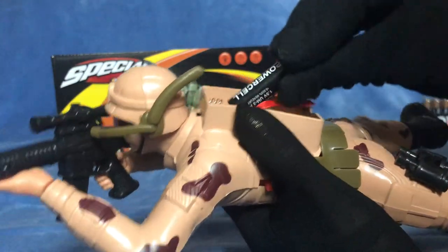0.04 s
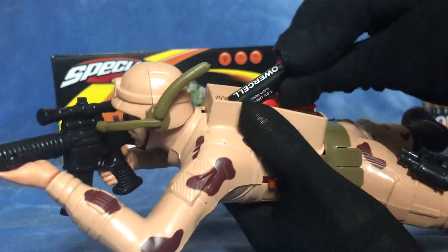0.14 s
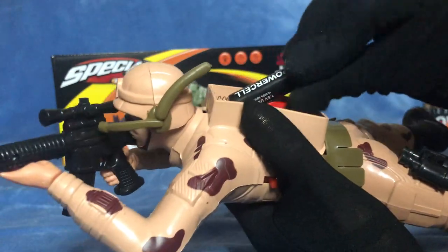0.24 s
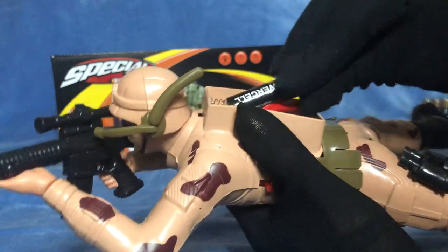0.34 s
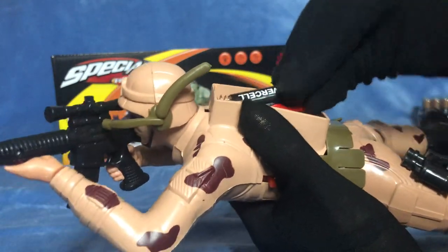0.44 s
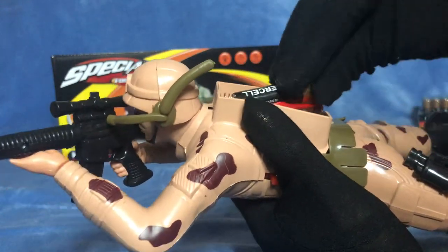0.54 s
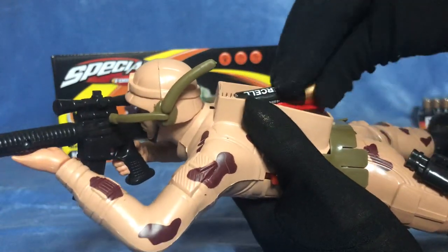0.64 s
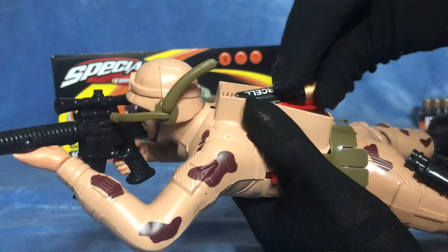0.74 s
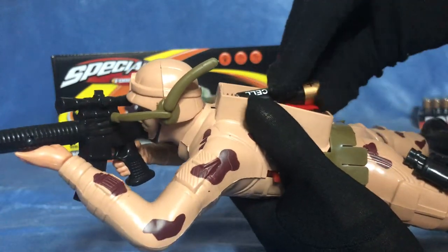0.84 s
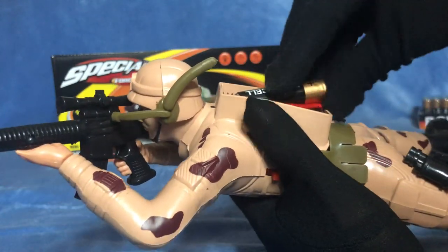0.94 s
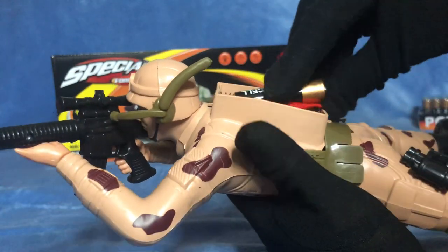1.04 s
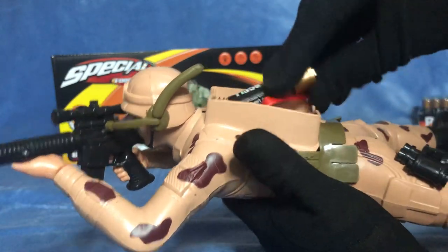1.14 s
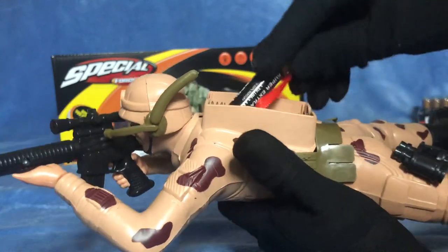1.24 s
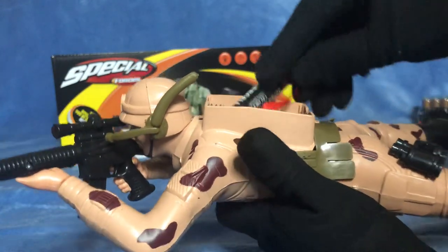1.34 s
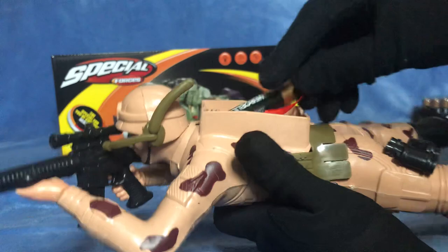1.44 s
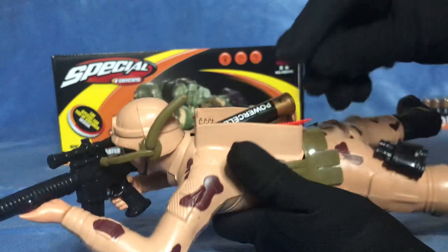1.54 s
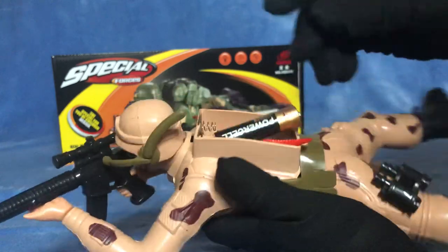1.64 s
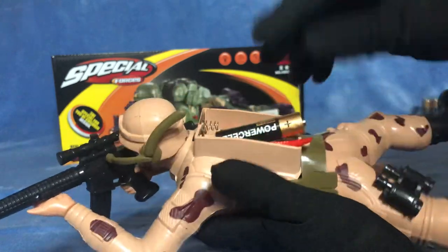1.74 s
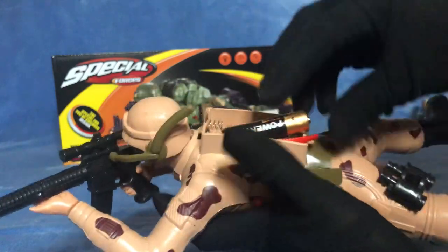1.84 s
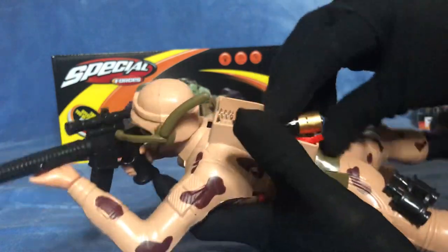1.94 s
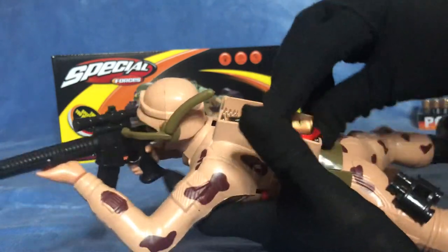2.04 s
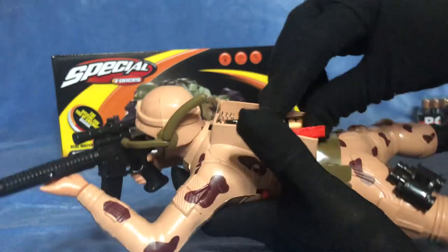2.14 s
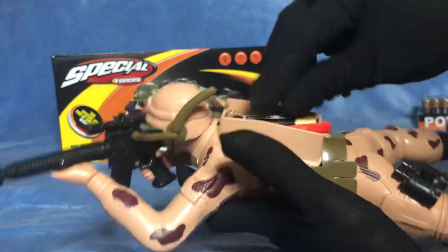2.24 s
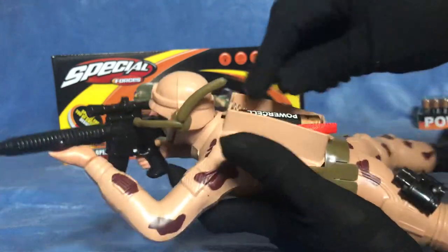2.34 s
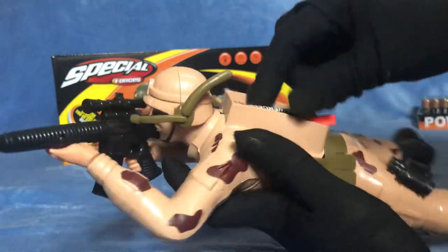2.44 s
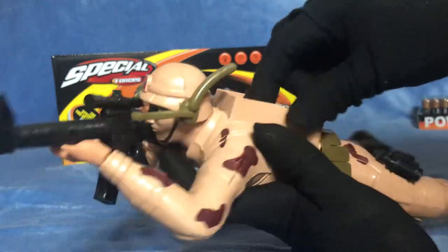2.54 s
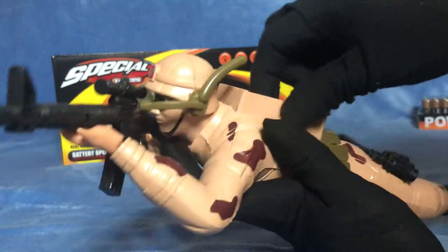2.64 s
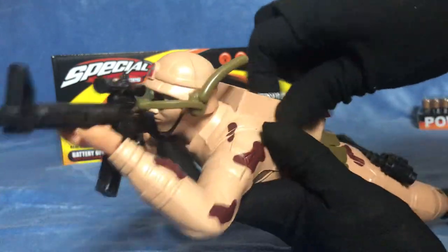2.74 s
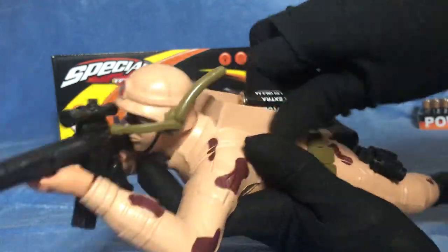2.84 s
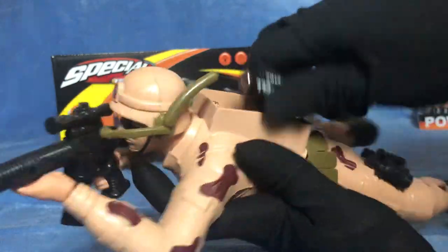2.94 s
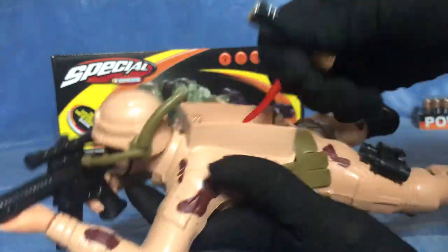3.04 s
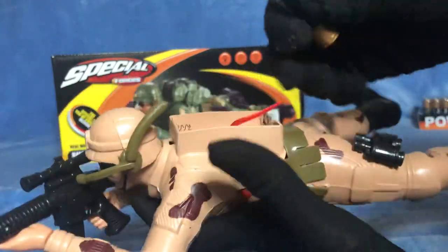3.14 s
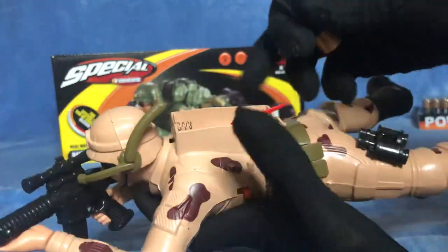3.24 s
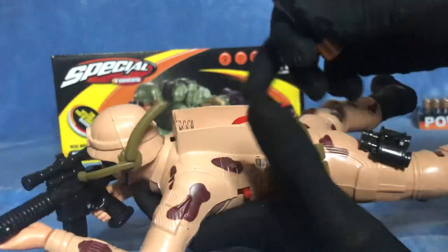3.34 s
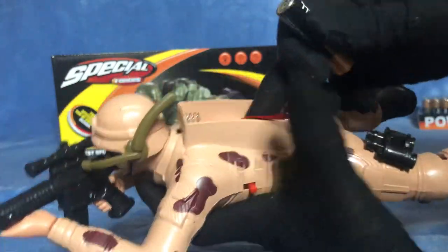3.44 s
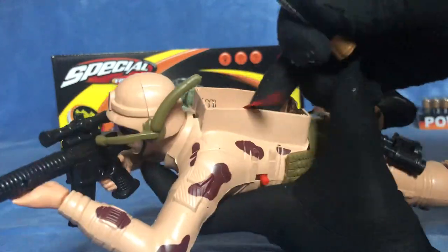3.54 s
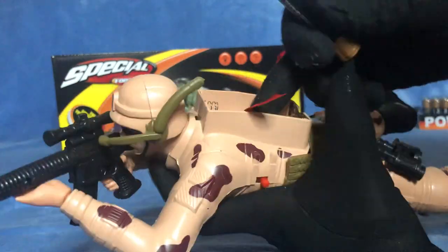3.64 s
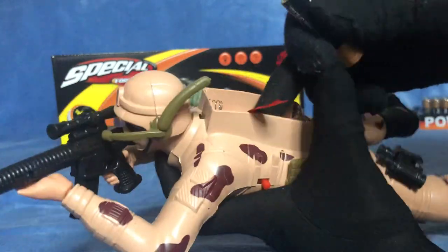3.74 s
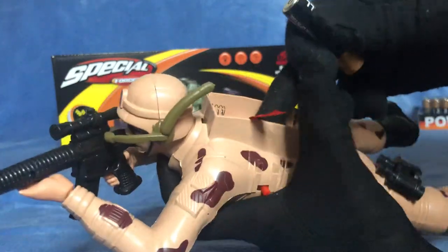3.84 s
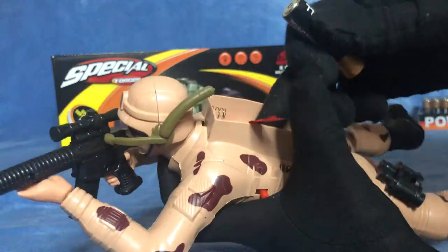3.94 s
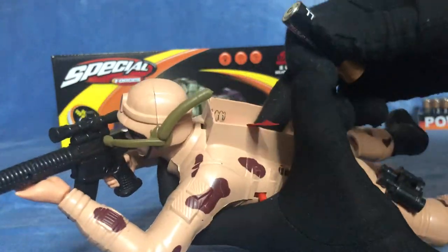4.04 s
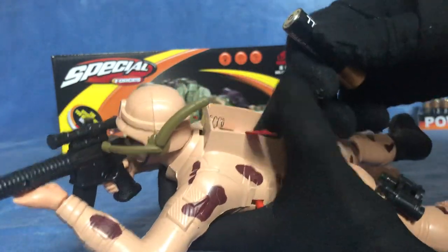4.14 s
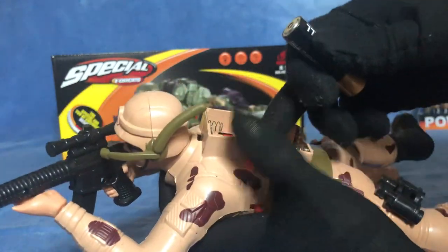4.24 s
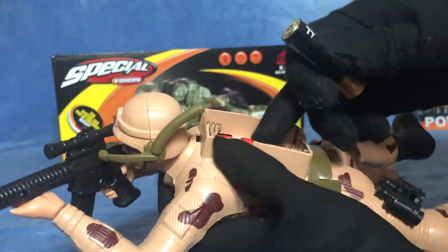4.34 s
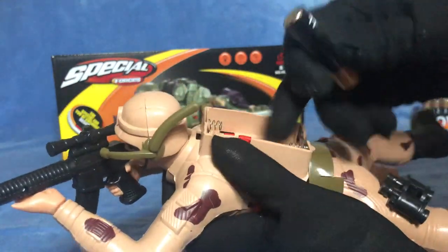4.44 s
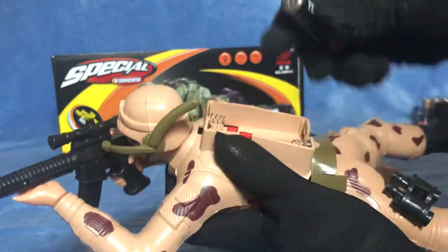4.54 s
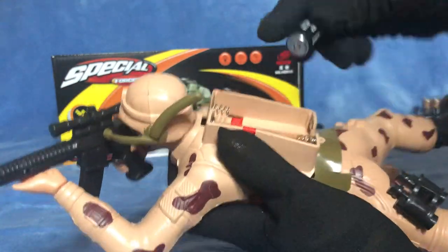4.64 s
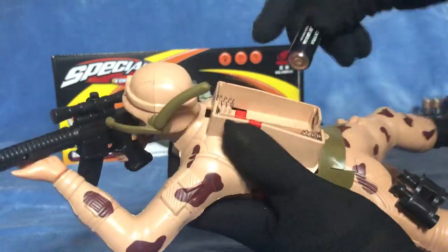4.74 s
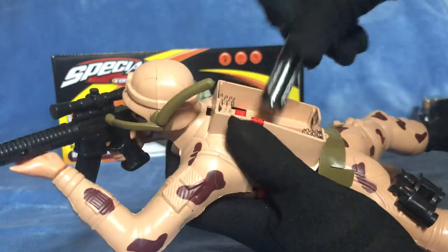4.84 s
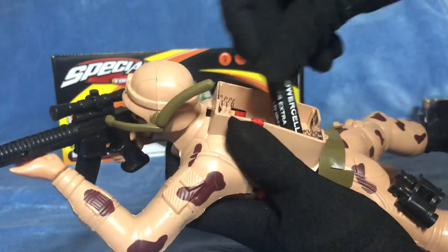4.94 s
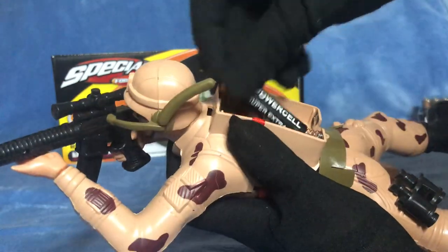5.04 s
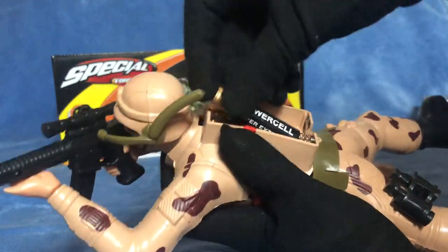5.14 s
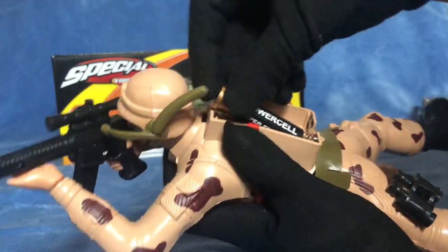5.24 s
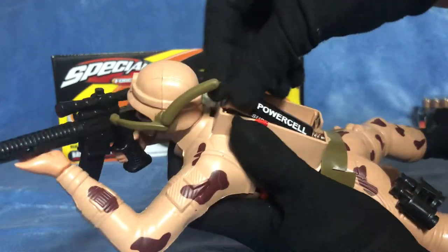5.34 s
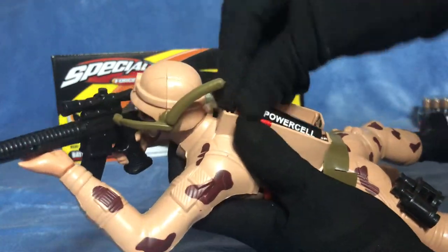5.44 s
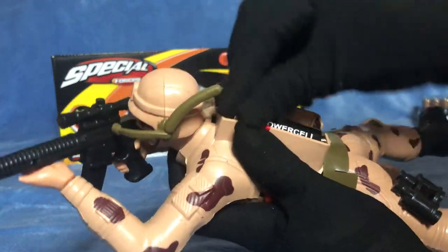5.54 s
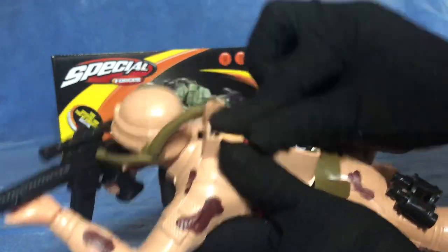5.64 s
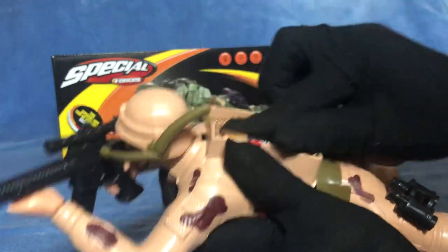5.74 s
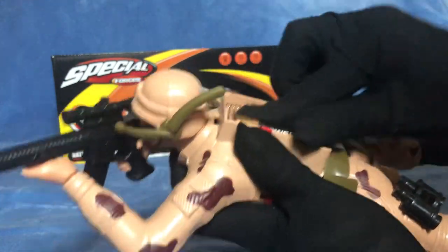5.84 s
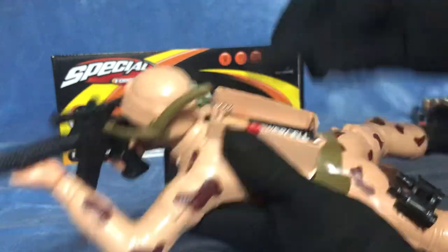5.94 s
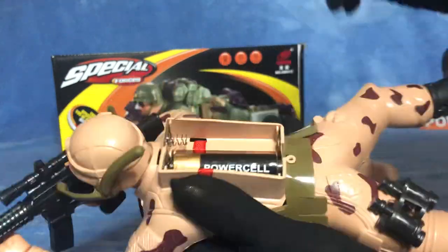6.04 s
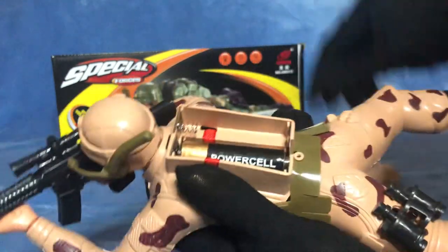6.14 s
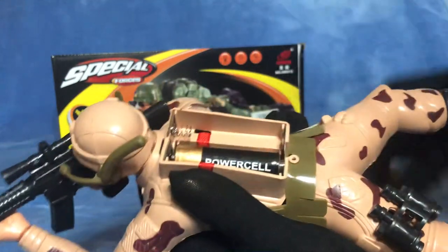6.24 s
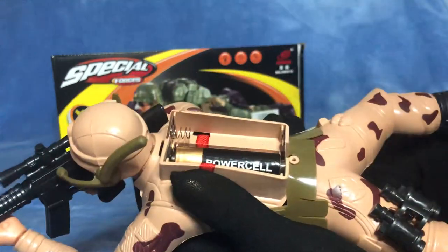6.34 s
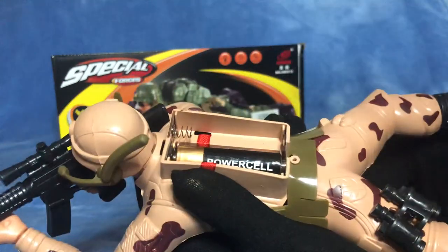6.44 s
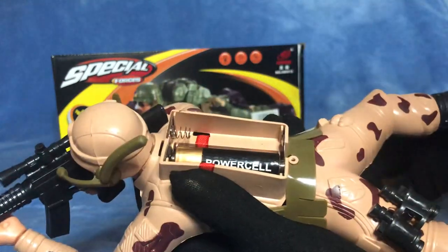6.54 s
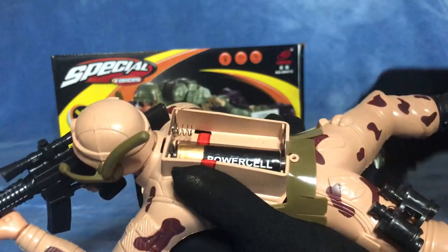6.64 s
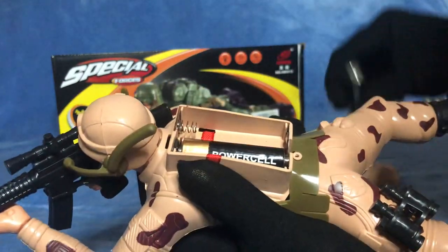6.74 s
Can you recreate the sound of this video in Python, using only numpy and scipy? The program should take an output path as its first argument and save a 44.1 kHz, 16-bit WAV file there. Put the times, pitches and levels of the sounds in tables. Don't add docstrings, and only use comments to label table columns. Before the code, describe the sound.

Batteries click, scrape and knock inside a hollow plastic toy, with one very hard snap, a lull, then more clicks over a low hum.

```python
import sys
import numpy as np
from scipy import signal
from scipy.fft import rfft, irfft
from scipy.io import wavfile
from scipy.ndimage import uniform_filter1d

SR = 44100
rng = np.random.default_rng(int(sys.argv[2]) if len(sys.argv) > 2 else 0)


def transcribe(signal):
    frames = np.atleast_2d(signal).T
    limited = np.clip(frames, -1, 1)
    pcm = np.round(limited * 32767).astype(np.int16)
    wavfile.write(sys.argv[1], SR, pcm)


def volts_from_decibels(level):
    exponent = np.asarray(level, float) / 20
    return 10 ** exponent


N = 300317
TIME = np.arange(N) / SR

# pitch_hz, level_db, time to fall 60 dB t60_s
SHELL = [(3050, -7, .005), (3400, 0, .006), (3750, 1, .007), (4150, 1, .007), (4600, 1, .006),
         (5050, -2, .005)]
HOLLOW = [(700, -4, .012), (950, -1, .012), (1200, -1, .01), (1450, 0, .011)]
WALL = [(1850, 0, .012), (2080, 0, .014), (2450, -6, .008)]
SNAP = [(5700, -2, .005), (6350, 0, .005), (6850, -1, .004), (7500, -9, .004)]
METAL = [(8600, -4, .003), (9300, -1, .004), (10400, -4, .003), (11900, -4, .003), (13300, -7, .003),
         (14800, -9, .003)]
PARTS = (SHELL, HOLLOW, WALL, SNAP, METAL)
PART_DELAY_S = (-.00017, -.0001, 0.0003, -.0001, -.0001)
SPREAD_CYCLES = (0.55, 1.12, 0.08, 0.18, 0.051)

# hollow_db, wall_db, hardness_db
CELL_BLOWS = [(0.3737, -36, -20, -13, -24), (0.3882, -42.5, -6, -7, -17), (0.3924, -36, -26, -19, -2),
              (1.4595, -38, -12, 0.5, -12), (1.7133, -31.5, -8.5, -11, -19), (1.7236, -43.5, -9, 4, -15),
              (1.7341, -45.5, -10, -1, -17), (1.961, -36, -3.5, -3.5, -16), (2.0318, -30, -10, -24, -3),
              (2.0487, -33.5, 1, -5, -17), (2.3595, -36, -5.5, -5, -15), (2.4804, -45.5, -1, 5, -14),
              (2.7394, -30, -19, -24, -9), (2.7452, -11.5, -34, -17, -18), (2.7514, -28, -18, -12, -15),
              (2.8694, -35, -21, -12, -11.5), (2.9261, -46.5, -15, -12, -3.5), (4.9343, -44, -22, -15, -12),
              (4.967, -33, -14, -33, -17.5), (5.0924, -36, -5, -13, -20), (5.389, -36.5, 2, 1, -5),
              (5.4538, -31, -8.5, -35, -4.5), (5.507, -36, 1, -5, -1), (5.7016, -37.5, -22, -7.5, 4)]
# hollow_db, wall_db, hardness_db
PLASTIC_BLOWS = [(0.0667, -43, -22, -26, -28), (0.0681, -53, -6, -23, -22), (0.6778, -48, 0.5, 4.5, -19),
                 (1.3614, -32.5, -14, -16, -10.5), (1.3838, -36.5, -13, -8, -18), (1.3996, -47, 0, -13, -9),
                 (1.4105, -52, 4, -15, -14), (1.4185, -49, -13, -16, -18), (1.4324, -48, -8, 3, -20),
                 (1.8214, -49, 3, 1, -20), (1.9663, -60, 7, -4, 9), (2.0727, -42, 4, -11, -14),
                 (2.3806, -55, 8, 4, -3), (2.3887, -50, -6, 1, -17), (2.493, -46, -1, -10, -7),
                 (2.512, -49, 3.5, -7, -10), (2.786, -48, 3.5, 4.5, -8), (2.8281, -48, -15, -13, -18),
                 (4.4244, -44.5, -11, -13, -13), (5.4498, -45, -21, -20, -19), (5.6435, -50, -6, -15, -1),
                 (5.6874, -36.5, -27, -22, -16), (5.8811, -55, -13, -23, 7), (5.9241, -47.5, -7, 6.5, -12),
                 (2.8708, -40.5, -20, -1, -16), (2.9285, -42, -13, -14, -6), (2.9302, -47, -10, -14, -10),
                 (2.9322, -54, -10, -10, -10), (4.9535, -49, -20, -25, -12), (4.9566, -48, -20, -23, -14),
                 (2.8615, -54, -20, -20, -8), (2.8645, -56, -20, -20, -8), (2.0333, -40, -13, -16, -5)]
CELL_SPOT_HZ = (3780, 4100, 4200, 3700, 4000, 3900, 3700, 3500, 3900, 3900, 3770, 3700, 4740, 3800, 4100,
                4860, 4300, 3650, 4530, 3850, 4480, 4200, 4500, 4900)
PLASTIC_SPOT_HZ = (4000, 4000, 3730, 4100, 4230, 4300, 4200, 4200, 3600, 3480, 4000, 3200, 3800, 3500, 3700,
                   4300, 3800, 4000, 4530, 4000, 4300, 4170, 4600, 4700, 3100, 3500, 4800, 3600, 4900, 4800,
                   4800, 4800, 3700)
TOUCH_SPOT_HZ, SPOT_DB_PER_OCT2 = 4000, -35
CELL_METAL_DB, PLASTIC_METAL_DB = -0.5, -21

# start_s, shell_db
SLIPS = [(0.092, -50), (0.1853, -54), (0.4038, -57), (1.1898, -57), (1.2003, -53), (1.7398, -53),
         (2.175, -58), (2.1814, -51), (2.431, -51), (2.8745, -52), (4.4354, -48), (5.0672, -56),
         (5.386, -50)]
CRACKLES = [(0.3115, -59), (0.318, -56), (1.5185, -56), (2.2871, -56.5), (2.414, -55), (3.811, -55.5),
            (4.3401, -61), (4.3596, -66), (5.1894, -57)]
KNOCKS = [(2.089, -53.5), (2.102, -54), (2.1095, -56), (5.3314, -68), (5.4626, -63), (5.7659, -55),
          (6.042, -52.5), (6.068, -55)]
TAPS = [(0.2911, -68), (1.6473, -67), (2.062, -56), (2.878, -67), (2.8823, -59), (2.9986, -54.5),
        (3.8582, -55.5), (5.604, -52.5), (5.6098, -55), (6.0285, -66), (6.1022, -51.5)]
# hollow_db, wall_db, snap_db, metal_db
SLIP_MIX, CRACKLE_MIX = (-5, -20, -14, -12), (-11, -14, -2, -2)
KNOCK_MIX, TAP_MIX = (8.5, 2, -11, -15), (1, 10.5, -7, -14)

# start_s, level_db, pitch_hz, t60_s
JOLTS = [
    (2.7485, -45, 280, 0.025),
    (1.8, -55, 620, 0.013),
    (2.05, -51, 490, 0.018),
    (2.5, -51, 570, .018),
    (6.9, -55, 580, .015),
    (4.9, -56, 460, 0.023),
    (5.456, -51, 570, 0.026),
    (5, -53, 550, 0.018),
]
# start_s, level_db, pitch_hz, t60_s
PINGS = [(.3926, -46, 3640, .012), (.3926, -47, 6500, .006), (4.9345, -52, 3600, .01),
         (1.384, -54, 910, .015), (1.4594, -43, 1410, 0.014), (1.4594, -45.5, 3520, 0.0081),
         (2.0332, -38.5, 3750, 0.012), (2.049, -43, 1430, 0.013), (2.032, -42, 5500, .006),
         (2.7446, -31, 4000, 0.004), (2.7452, -38, 11200, .003), (2.7455, -34.5, 6800, 0.0095),
         (2.7478, -27, 3400, .005), (2.7515, -40, 6600, .005), (1.7135, -42, 4200, .005),
         (2.7456, -30, 3200, .004), (5.0926, -39, 3800, .008), (2.748, -37, 1960, 0.018),
         (2.7516, -30, 4500, 0.0033), (2.8705, -40, 2540, 0.008), (2.9263, -54, 1510, 0.013),
         (4.9672, -43, 4340, .005), (4.9755, -62, 8100, .012), (2.898, -62, 3800, .015),
         (4.5215, -53, 5800, .006), (6.2086, -58, 6000, .006), (.2145, -56, 5500, .006),
         (1.9612, -40, 2500, 0.0088), (2.3597, -41, 2520, 0.0095), (2.0489, -45, 4100, 0.0053),
         (2.493, -57, 11500, .004), (4.4246, -60, 11500, .004), (4.4356, -59, 11800, .004),
         (2.9285, -52, 3380, 0.014), (5.0926, -44.5, 1270, 0.013), (5.389, -36, 9100, 0.0058),
         (5.454, -36, 8800, 0.008), (5.3892, -37, 4200, 0.0071), (5.454, -39, 4200, .007),
         (5.454, -41, 7300, 0.01), (5.5072, -36, 9500, 0.0054), (5.7024, -31, 5510, 0.008),
         (5.7018, -40, 10800, .004), (5.6876, -48, 5600, .005), (5.881, -51, 5270, .015),
         (5.893, -56, 5300, .015), (6.0285, -55, 5530, .006), (6.042, -56, 5400, 0.0067),
         (6.068, -51, 2020, .012), (6.068, -55, 6000, 0.0054)]

# start_s, length_s, level_db, brightness_db
SCRAPES = [(.384, 0.02, -49.5, -19), (2.474, 0.023, -54, -15), (2.728, 0.015, -61, -3),
           (4.949, 0.037, -59, -10), (5.056, 0.025, -53.5, -23), (5.594, 0.029, -56, 0),
           (5.62, 0.044, -53, -10), (5.648, 0.038, -64, -1), (5.876, .026, -60.5, 8.5),
           (5.892, .035, -54.5, -1), (5.912, 0.021, -51, -4.5)]
# start_s, length_s, level_db, brightness_db
STROKES = [(.05, 0.21, -74, -1), (.26, .12, -62.5, -2), (.43, .1, -71.5, -5), (.66, 0.12, -83, 0),
           (.96, 0.11, -68, 0), (1.09, 0.099, -66, -4), (1.32, 0.33, -63.5, -7), (1.41, 0.34, -64, -1),
           (1.88, 0.27, -68, -7), (2.13, 0.13, -69, -2), (2.34, 0.29, -63.5, -6), (2.7, 0.18, -58.5, -9),
           (2.91, 0.15, -63, 0), (3.3, 0.16, -72, -2), (3.4, 0.21, -70, -3), (3.7, 0.2, -78, -4),
           (4.32, 0.24, -67.5, -4.5), (4.55, 0.15, -80, 9), (4.7, 0.15, -78.5, 9), (4.93, 0.33, -77, -7),
           (5.2, 0.19, -70, -3), (5.39, 0.19, -69, -5), (5.57, 0.19, -65, 3.5), (5.77, 0.22, -65, -1.5),
           (6.0, 0.2, -80, -4)]
# start_s, length_s, level_db, overtone_db
SQUEAKS = [
    (2.171, .022, -64, -5),
    (2.195, .018, -68, -5),
]
# pitch_hz, level_db (per Hz)
CLOTH = [
    [(1200, -36), (1900, -1.5), (2600, -14), (3600, -4), (4600, -5.5), (5600, -5.5), (6800, -39)],
    [(5200, -32), (6200, -4.5), (7200, -4), (8600, -4.5), (10200, -6), (12500, -5.5), (16000, -8)],
]
DRAG = [
    [(1200, -27), (1900, -3.5), (2600, -15), (3600, -5.5), (4600, -4.5), (5600, -4), (6800, -32)],
    [(4600, -21), (5400, -3), (6300, -7), (7300, -5), (8700, -10), (10200, -1), (12000, -7), (16000, -17)],
]
SPRING = [
    [(10500, -30), (11800, -2), (12500, 0), (13200, -25)],
    [(13000, -25), (14000, 0), (15300, -2), (16500, -20)],
]
GRIP_DB, GRIP_BRIGHT_DB = -80, -5
STROKE_POINT, SCRAPE_POINT = 1.55, 1.2

TABLE_T60_S, TABLE_DB = 0.054, -14

# start_s, lead_turns
FAN_LEAD = [(0, .33), (.4, .31), (1.2, .42), (2.4, .58), (3.6, .54), (4.6, .46), (5.3, .53), (6.0, .42),
            (6.81, .43)]
# pitch_hz, level_db (per Hz)
RATTLE = [(1800, -38), (2400, -17), (3600, 4.5), (4400, -1), (5500, -4), (7500, -11.5), (10000, -15),
          (16000, -13)]
FAN_HZ, RATTLE_DB = 17.45, -71.5
RATTLE_START, RATTLE_FADE = 0.84, 0.31

# multiple of the shaft rate, level_db
HUM = [(2, -62), (3, -60), (6, -73), (7, -68), (18, -78), (20, -77), (22, -81), (26, -82), (27, -82),
       (28, -82), (30, -81), (32, -82), (37, -83)]
SHAFT_HZ = 46.05

# pitch_hz, level_db (per Hz)
RUMBLE = [(12, -47), (20, -14.5), (54, -7), (87, -1), (146, -11), (162, -12), (195, -6), (236, -11),
          (275, -10.5), (381, -16), (682, -22), (730, -23.5), (782, -24.5), (944, -18), (1200, -27),
          (1560, -62), (2640, -120)]
AIR = [(900, -24), (1150, 2.5), (1400, 1.5), (1650, 0), (2000, -1.5), (2500, -5.5), (3000, -8), (3800, -9),
       (5000, -15), (6500, -19), (9000, -19), (16000, -26.5)]
RUMBLE_DB, AIR_DB = -52.5, -65
# centre_s, length_s, level_db
SWELLS = [(.5, 1.1, 3), (1.45, .4, 3.5), (2.3, .7, 2), (2.85, 0.31, 3.5), (3.443, 0.18, 7),
          (3.697, 0.16, 3), (3.95, 0.17, 0), (4.403, .25, 4.5), (5.3, 2, 4.5), (6.155, 0.2, 4),
          (6.615, 0.24, 4.5)]
SWELL_REST_DB = -1.5


def level(x, db):
    return x * volts_from_decibels(db) / np.sqrt(np.mean(x ** 2))


def coloured(x, points):
    hz, db = np.transpose(points)
    grid = np.log(np.arange(len(x) // 2 + 1) * SR / len(x) + 1)
    gain = volts_from_decibels(np.interp(grid, np.log(hz), db))
    return level(irfft(rfft(x) * gain, len(x)), 0)


def walk(rate):
    k = int(SR / rate)
    steps = np.repeat(rng.standard_normal(N // k + 1), k)[:N]
    return 1.43 * uniform_filter1d(uniform_filter1d(steps, k), k)


def grains(per_s, spread_db):
    size = volts_from_decibels(spread_db * np.minimum(rng.exponential(size=N), 3))
    happens = rng.random(N) < per_s / SR
    return rng.standard_normal(N) * (1 + size * happens)


def arch(start, length, point):
    progress = np.clip((TIME - start) / length, 0, 1)
    return np.sin(np.pi * progress).clip(0) ** point


def contact_rows():
    rows = []
    for table, spots, metal_db in ((CELL_BLOWS, CELL_SPOT_HZ, CELL_METAL_DB),
                                   (PLASTIC_BLOWS, PLASTIC_SPOT_HZ, PLASTIC_METAL_DB)):
        for (s, *part_db), spot_hz in zip(table, spots):
            rows.append((s, spot_hz, *part_db, part_db[-1] + metal_db))
    for table, mix in ((SLIPS, SLIP_MIX), (CRACKLES, CRACKLE_MIX), (KNOCKS, KNOCK_MIX), (TAPS, TAP_MIX)):
        for s, db in table:
            rows.append((s, TOUCH_SPOT_HZ, db, *mix))
    return sorted(rows)


def part_ring(part, span, spread, spot_hz, chance, chatter, t):
    hz, mode_db, t60 = np.transpose(part)[:, :, None]
    chance = chance[:len(part)]
    u = np.maximum(t - spread * (1 / hz - 1 / hz[-1]), 0)
    fade = volts_from_decibels(mode_db + 2 * chance[:, :1] - 60 * u / t60)
    ring = fade * np.sin(2 * np.pi * hz * (1 + .025 * chance[:, 1:]) * u)
    if part is SHELL:
        ring = ring * volts_from_decibels(SPOT_DB_PER_OCT2 * np.log2(hz / spot_hz) ** 2)
    rough = signal.fftconvolve(ring, chatter[None], axes=1)[:, :len(t)]
    share = np.sqrt(np.sum(ring ** 2, 1) / np.sum(rough ** 2, 1))
    return signal.sosfilt(span, share @ rough)


def contacts(chatter_s=.0006, buzz_s=0.0039, buzz_db=-17, blow=4.8):
    out, t = np.zeros(N + 1024), np.arange(1024) / SR
    spans = [signal.butter(3, [.9 * part[0][0], 1.06 * part[-1][0]], "band", fs=SR, output="sos")
             for part in PARTS]
    push = t / chatter_s * np.exp(1 - t / chatter_s * 2)
    push = push + volts_from_decibels(buzz_db) * np.exp(-t / buzz_s) * (t > chatter_s)
    for s, spot_hz, ring_db, *rest_db in contact_rows():
        chances = rng.standard_normal((5, 6, 2))
        chatter = rng.standard_normal(len(t)) * push
        chatter[int(chatter_s * SR)] += blow
        for part, span, db, delay, spread, chance in zip(
                PARTS, spans, [0] + rest_db, PART_DELAY_S, SPREAD_CYCLES, chances):
            ring = part_ring(part, span, spread, spot_hz, chance, chatter, t)
            at = int((s + delay) * SR)
            packed = np.sqrt(0.0012 * SR / np.sum(ring ** 2))
            out[at:at + len(t)] += ring * volts_from_decibels(ring_db + db) * packed
    return out[:N]


def single_rings(table):
    out = 0
    for s, db, hz, t60 in table:
        t = np.maximum(TIME - s, 0)
        attack = 1 - np.exp(-t / 0.00069)
        out = out + volts_from_decibels(db + 13.5 - 60 * t / t60) * attack * np.sin(2 * np.pi * hz * t)
    return out


def friction(table, slips, colours, point, rest_db=-120, rest_bright_db=0):
    lower, upper = (coloured(slips, c) for c in colours)
    dull, bright = volts_from_decibels(2 * rest_db), volts_from_decibels(2 * (rest_db + rest_bright_db))
    for start, length, db, bright_db in table:
        power = volts_from_decibels(2 * db) * arch(start, length, 2 * point)
        dull = dull + power
        bright = bright + power * volts_from_decibels(2 * bright_db)
    return lower * np.sqrt(dull) + upper * np.sqrt(bright)


def scrapes():
    return friction(SCRAPES, grains(1000, 5.3) * volts_from_decibels(3.0 * walk(250)), DRAG, SCRAPE_POINT)


def glove_rub():
    rub = friction(STROKES, grains(440, 3.7), CLOTH, STROKE_POINT, GRIP_DB, GRIP_BRIGHT_DB)
    return rub * volts_from_decibels(2.0 * walk(50) + 2.3 * walk(160))


def spring_squeak():
    return friction(SQUEAKS, grains(700, 5.0), SPRING, SCRAPE_POINT)


def table_echo(x):
    t = np.arange(int(.12 * SR)) / SR
    tail = rng.standard_normal(len(t)) * volts_from_decibels(-60 * t / TABLE_T60_S) * (t > .002)
    tail = tail / np.sqrt(np.sum(tail ** 2))
    return x + volts_from_decibels(TABLE_DB) * signal.fftconvolve(x, tail)[:N]


def compressor():
    out = 0
    for k, db in HUM:
        strength = volts_from_decibels(db + 2 * walk(9)) * np.sqrt(2)
        out = out + strength * np.sin(2 * np.pi * (k * SHAFT_HZ * TIME + .15 * walk(8)))
    return out


def fan():
    turns = FAN_HZ * TIME + np.interp(TIME, *np.transpose(FAN_LEAD)) - RATTLE_START
    size = volts_from_decibels(2 * rng.standard_normal(200))[np.floor(turns).astype(int) + 2]
    burst = uniform_filter1d(size * np.exp(-(turns % 1) / RATTLE_FADE), size=240)
    return level(burst * coloured(grains(900, 3.2), RATTLE), RATTLE_DB)


def room():
    rumble = coloured(rng.standard_normal(N), RUMBLE)
    in_bass = np.abs(np.arange(N // 2 + 1) * SR / N - 82) < 30
    bass = irfft(rfft(rumble) * in_bass, N)
    swell_db = SWELL_REST_DB + sum(db * arch(s - length / 2, length, 0.82) for s, length, db in SWELLS)
    air = coloured(rng.standard_normal(N), AIR)
    return level(rumble + bass * (volts_from_decibels(swell_db) - 1), RUMBLE_DB) + level(air, AIR_DB)


def scene():
    rub = glove_rub()
    scrape = scrapes()
    toy = table_echo(contacts() + single_rings(JOLTS) + rub + scrape)
    background = compressor() + fan() + room()
    return (toy + single_rings(PINGS) + background + spring_squeak())[None]


def roll_off(x):
    return signal.sosfilt(signal.butter(12, 16660, fs=SR, output="sos"), x)


def record(dry):
    top_cut = signal.ellip(9, .2, 38, 15720, fs=SR, output="sos")
    mix = signal.sosfilt(top_cut, dry)
    return roll_off(mix)


dry = scene()
out = record(dry)
transcribe(out)
```